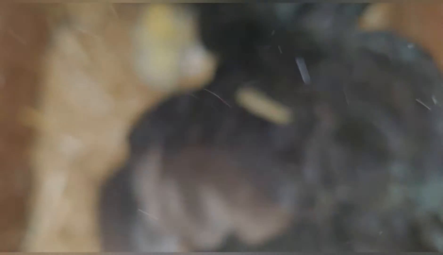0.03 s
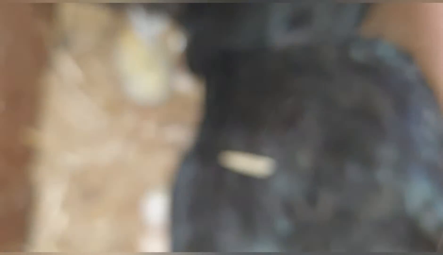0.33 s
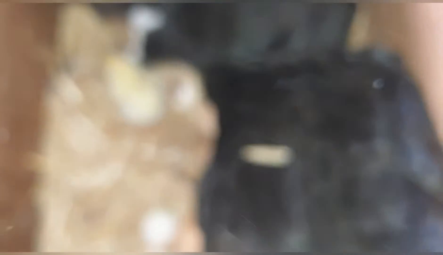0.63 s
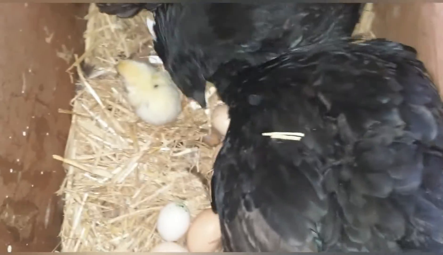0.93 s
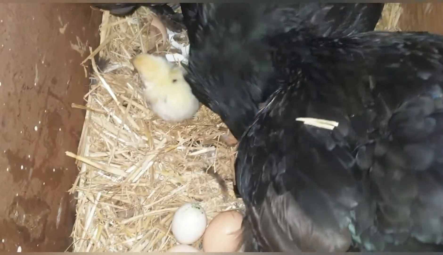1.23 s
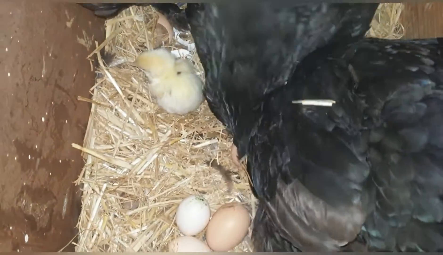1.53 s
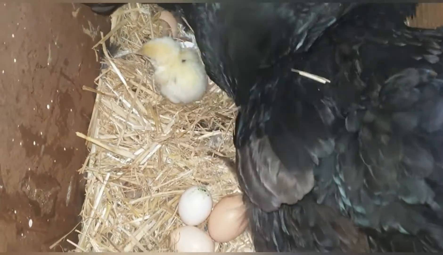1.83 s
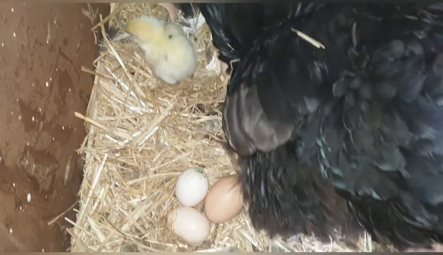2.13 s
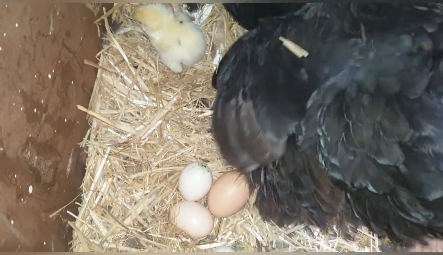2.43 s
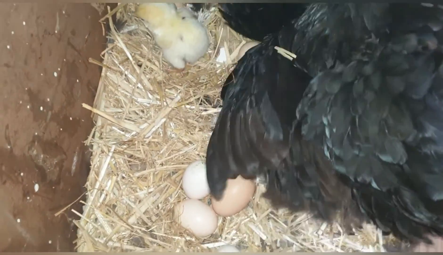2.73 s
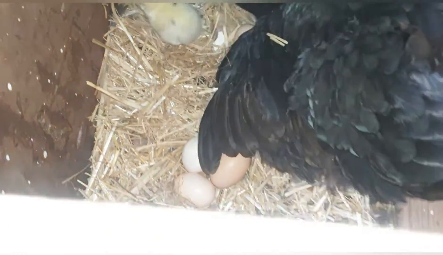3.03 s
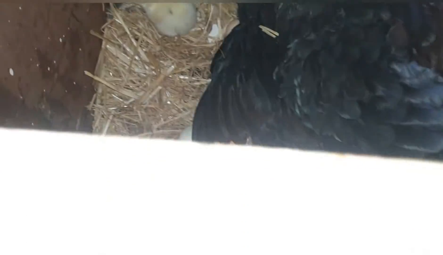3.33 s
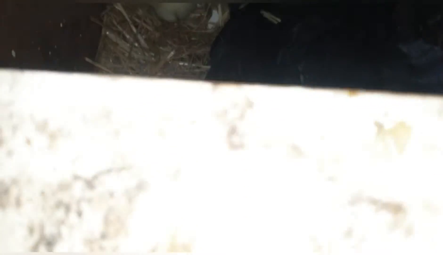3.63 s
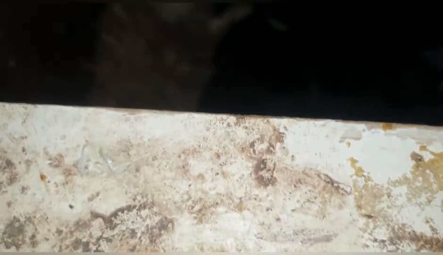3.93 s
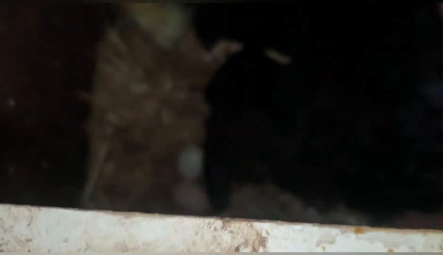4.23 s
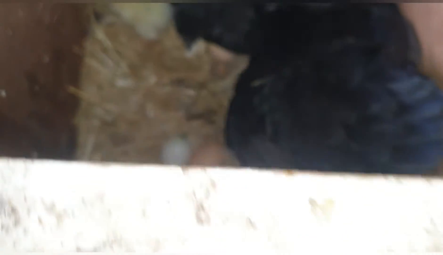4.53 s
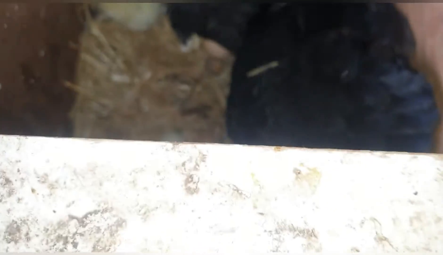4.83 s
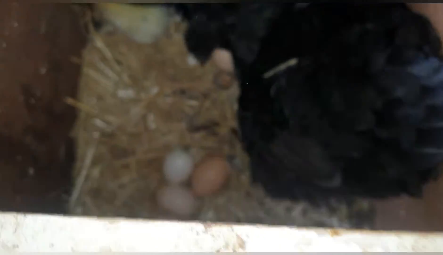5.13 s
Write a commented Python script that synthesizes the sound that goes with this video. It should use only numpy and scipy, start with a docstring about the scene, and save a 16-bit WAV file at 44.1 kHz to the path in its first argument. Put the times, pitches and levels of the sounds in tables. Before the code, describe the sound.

Close by in a small wooden coop, disturbed hens keep up rapid low clucks and hoarse, evenly paced calls that ring the nest box. A harsh squawk breaks out before the middle and another near the end, followed by a few thin whines. A chick peeps faintly now and then, straw rustles and snaps, and the box takes a few soft bumps over a faint hiss and hum.

```python
"""Broody hens disturbed in a coop

Close by in a small wooden coop, hens call with puffs of air shaped by throat and beak: low arching
clucks, hoarse evenly paced buks that ring the nest box, two harsh squawks and a few thin whines.
A chick whistles, straw rustles and snaps under the birds, and the box takes a few soft bumps.
A faint background hiss and a low hum lie underneath."""
import sys
import numpy as np
from scipy import signal
from scipy.fft import rfft, irfft, next_fast_len
from scipy.io import wavfile
from scipy.ndimage import uniform_filter1d

SR = 44100
rng = np.random.default_rng(int(sys.argv[2]) if len(sys.argv) > 2 else 0)


def file_out(sig):
    """Save sig as 16-bit WAV at sys.argv[1]."""
    # one column per channel
    cols = np.atleast_2d(sig).T
    # limit, then scale
    lim = np.clip(cols, -1, 1)
    pcm = np.round(lim * 32767).astype(np.int16)
    wavfile.write(sys.argv[1], SR, pcm)


N = 228834

# clucks: top of arch t/s, length/s, top f/Hz, level/dB
CLUCKS = [(.003, 0.059, 756.4, -37), (0.387, 0.051, 625.6, -35), (0.413, 0.046, 799, -37),
          (0.711, .044, 722.3, -34), (0.929, 0.059, 920, -37), (1.065, 0.041, 688.6, -30.5),
          (1.347, 0.05, 782.5, -31), (1.381, .027, 796, -28), (1.726, 0.033, 785, -28.5),
          (2.057, .05, 782.4, -35.5), (2.382, 0.025, 828, -44.5), (2.421, 0.047, 772, -36.5),
          (2.588, 0.041, 882, -48.5), (2.781, 0.028, 724, -34), (2.8, 0.035, 747.5, -36),
          (2.917, 0.035, 752, -43.5), (3.017, 0.061, 792, -46), (3.205, 0.052, 874, -37.5),
          (3.481, .052, 957, -41), (3.541, 0.044, 831, -41), (3.755, 0.02, 723, -42.5),
          (3.879, 0.051, 964, -40.5), (3.967, 0.045, 818, -39), (4.407, .048, 875, -36.5),
          (4.443, 0.072, 884, -37), (4.871, 0.053, 878, -40), (5.025, 0.077, 949, -39.5)]
# throat response, beak shut: f/Hz, gain/dB
CLUCK_THROAT = [(100, -26), (230, 2), (400, -0.5), (540, 3), (750, 1), (950, -5), (1150, -12.5),
                (1450, -21.5), (1900, -31), (4000, -75.5)]


def clucks(start_hz=409.7, end_hz=184, rise_share=.51, tail_s=.012, tail_db=-30):
    """Beak shut: a soft, near-pure tone arches up, then drops louder into single throaty puffs."""
    out = np.zeros(N)
    for top, length, top_hz, level_db in CLUCKS:
        start = top - rise_share * length
        end = start + length
        t = span(max(start, 0), end + tail_s)
        rise = np.clip((t - start) / (top - start), 0, 1)
        fall = np.clip((t - top) / (end - top), 0, 1)
        hz = start_hz + (top_hz - start_hz) * np.sin(rise * np.pi / 2) ** 1.554
        hz += (end_hz - top_hz) * (1 - np.exp(-(fall / .41) ** 2))
        puffs = syrinx(hz, jitter=.027 + .063 * fall, shimmer_db=1.8, air=.06)
        tone = evened(colour(puffs, CLUCK_THROAT), samples=260)
        shape_db = np.interp(fall, [0, .21, .85, 1], [-5, 3.5, -3, -14])
        shape_db += tail_db * np.maximum(t - end, 0) / tail_s
        add(out, t[0], tone * from_db(level_db + shape_db) * faded(t, fade_s=.005))
    return out


# buks: loudest t/s, level/dB, swell/s
BUKS = [(0.121, -41.5, 0.0175), (0.346, -41, 0.0194), (.568, -40.5, 0.0178), (0.787, -39, 0.0172),
        (1.011, -38, 0.0215), (1.235, -31.5, 0.0228), (1.464, -30, 0.022), (1.684, -29, 0.021),
        (2.278, -29.5, 0.0156), (2.531, -37, 0.0198), (2.787, -38.5, 0.0152), (3.093, -37, 0.011),
        (3.333, -37, 0.0203), (3.562, -33, 0.0155), (3.793, -35.5, 0.0298), (4.007, -33, 0.0152),
        (4.662, -34, 0.023), (4.899, -34, 0.0187), (5.138, -35, 0.0188)]
# throat and beak response: f/Hz, gain/dB
BUK_THROAT = [(200, -25.5), (420, 3), (680, -7), (800, 1), (980, 2.5), (1250, -6.5), (1480, -14),
              (1800, -4.5), (2550, -19.5), (3100, -32.5), (4500, -30.5), (6800, -24.5), (9000, -41.5),
              (16000, -39)]
# nest box air modes: f/Hz, width/Hz, gain/dB
BOX_MODES = [(806.5, 65, 11.5), (835.5, 33, 0), (1005, 136, 1), (946, 15, 20), (1233, 60, 8),
             (2612, 197, 18.5)]


def buks(lead_s=.031):
    """A short chaotic burst of voice rings the air modes of the box."""
    out = np.zeros(N)
    for peak_s, level_db, swell_s in BUKS:
        t = span(peak_s - lead_s, peak_s + .19)
        push = np.exp(-np.abs((t - peak_s + .0043) / swell_s) ** 1.06)
        puffs = syrinx(hz=750 + 60 * push, jitter=.19, shimmer_db=2.5, air=1.0)
        voice = colour(push * puffs, BUK_THROAT)
        voice += sum(from_db(db) * resonate(voice, hz, width) for hz, width, db in BOX_MODES)
        peak_rms = np.sqrt(uniform_filter1d(voice ** 2, size=900).max())
        add(out, t[0], from_db(level_db) * voice / peak_rms)
    return out


# squawks: t/s, length/s, effort build-up/s, strain onset/s, f/Hz, level/dB, swell/(dB/s), brightness/dB
SQUAWKS = [(1.746, 0.29, .011, .18, 863.8, -27.5, -7, 2.5), (4.076, 0.3, .062, .15, 856.5, -32, 16.5, -1)]
# throat response, beak open: f/Hz, gain/dB
SQUAWK_THROAT = [(200, -45.5), (570, -17), (860, 0.5), (1150, -6.5), (1430, -9.5), (1720, 0.5), (2030, -1),
                 (2330, 0), (2610, -7.5), (2900, -22), (3450, -25.5), (4750, -22), (6800, -20.5),
                 (8300, -31.5), (16000, -35)]


def squawks(strain_s=.13, release_s=.0668, slack_db=-8.5, release_db=-24, closing_db=-25.5, rasp_db=2.5):
    """Beak open: effort builds to a clear note, every third puff stronger; strain breaks it into chaos."""
    out = np.zeros(N)
    lowpass = signal.butter(4, 1350, fs=SR, output="sos")
    highpass = signal.butter(4, 3400, "high", fs=SR, output="sos")
    for start, length, build_s, clear_s, held_hz, held_db, swell_db_per_s, open_db in SQUAWKS:
        t = span(0, length + release_s)
        slack = np.exp(-t / build_s)
        strain = np.clip((t - clear_s) / strain_s, 0, 1)
        release = np.clip((t - length) / release_s, 0, 1)   # pitch sags, beak closes
        hz = held_hz * (1 - .125 * slack + .025 * np.sin(np.pi * strain) ** 2 - .072 * release)
        hz *= 1 + .0055 * waver(len(t), per_s=61.7)
        rough = .87 * slack ** 1.55 + .99 * strain ** 1.32
        puffs = syrinx(hz, jitter=.015 + .12 * rough, shimmer_db=4 * rough, air=.02 + .5 * rough,
                       weak=.35, strong_every=3)
        voice = colour(puffs, SQUAWK_THROAT)
        chest = signal.sosfiltfilt(lowpass, voice)
        beak = evened(voice - chest, samples=700)
        treble_flutter = from_db(3.3 * waver(len(t), per_s=120)) - 1
        beak += treble_flutter * signal.sosfiltfilt(highpass, beak)
        voice = evened(chest, samples=700) + from_db(open_db + closing_db * release) * beak
        level_db = held_db + swell_db_per_s * t + slack_db * slack + release_db * release
        spurts_db = rasp_db * rough * waver(len(t), per_s=140)
        add(out, start, from_db(level_db + spurts_db) * voice * faded(t, fade_s=.0064))
    return out


# whines: t/s, length/s, first f/Hz, last f/Hz, level/dB
WHINES = [(2.916, 0.063, 685, 685, -57.5), (3.144, 0.057, 692, 675, -57.5), (3.365, 0.078, 556, 528, -57.5),
          (3.67, 0.33, 655.5, 600, -65.5), (4.488, 0.203, 613.5, 637.7, -40.5),
          (4.653, 0.14, 805.3, 742.4, -42), (4.92, 0.062, 756, 735, -50)]
# throat and beak response: f/Hz, gain/dB
WHINE_THROAT = [(300, -13), (640, 4), (1250, -9.5), (1900, 6.5), (2400, 5.5), (3150, -3.5), (4000, -9.5),
                (6800, -13), (9000, -22.5), (16000, -32)]


def whines():
    """Thin wavering notes of alternately strong and weak puffs, gliding slowly."""
    out = np.zeros(N)
    for start, length, first_hz, last_hz, level_db in WHINES:
        t = span(0, length)
        hz = np.linspace(first_hz, last_hz, len(t)) * (1 + .0072 * waver(len(t), per_s=73.4))
        puffs = syrinx(hz, jitter=.01, shimmer_db=1.3, air=.22, weak=.82, strong_every=2)
        voice = evened(colour(puffs, WHINE_THROAT), samples=500)
        gain = from_db(level_db + 1.2 * waver(len(t), per_s=50))
        add(out, start, gain * voice * faded(t, fade_s=.028))
    return out


def syrinx(hz, jitter, shimmer_db, air, weak=1, strong_every=1):
    """One puff a cycle, uneven in time (jitter/cycles) and strength, with pulsing air noise."""
    cycles, samples = np.cumsum(hz) / SR, np.arange(len(hz))
    puff = np.arange(int(cycles[-1]) + 1)
    chance = rng.standard_normal((1000, 2))[:len(puff)]
    jitter, shimmer_db = (np.interp(puff, cycles, v + 0 * hz) for v in (jitter, shimmer_db))
    position = np.interp(puff + jitter * chance[:, 0], cycles, samples)
    strength = np.where(puff % strong_every, weak, 1) * from_db(shimmer_db * chance[:, 1])
    whole, part = position.astype(int), position % 1   # each puff straddles two samples
    pulses = np.bincount(whole, strength * (1 - part), len(hz) + 1)[:-1]
    pulses += np.bincount(whole + 1, strength * part, len(hz) + 1)[:-1]
    hiss = rng.standard_normal(SR)[:len(hz)] * (1 + np.cos(2 * np.pi * cycles))
    return rms_one(pulses - uniform_filter1d(pulses, 256)) + air * hiss


# peeps: t/s, length/s, first f/Hz, last f/Hz, level/dB
PEEPS = [(0.188, 0.044, 4360, 2270, -58), (0.699, 0.06, 4460, 2420, -57.5),
         (1.375, 0.077, 3950, 2600, -54.5), (1.618, 0.039, 3680, 4310, -49),
         (3.042, 0.042, 3490, 2620, -59), (4.009, 0.063, 2680, 4220, -52), (4.449, 0.069, 3750, 4000, -54),
         (4.759, 0.075, 3520, 4800, -54.5), (5.151, 0.045, 3430, 3100, -59.5)]


def chick(octave_db=-16, scoop_hz=490):
    """Whistles with a weak octave glide ever faster; rising ones dip first."""
    out = np.zeros(N)
    for start, length, first_hz, last_hz, level_db in PEEPS:
        progress = np.linspace(0, 1, int(length * SR))
        hz = first_hz + (last_hz - first_hz) * progress ** 2
        if last_hz > first_hz:
            hz -= scoop_hz * np.sin(np.pi * progress)
        phase = 2 * np.pi * np.cumsum(hz) / SR
        whistle = np.sin(phase) + from_db(octave_db) * np.sin(2 * phase)
        add(out, start, from_db(level_db) * signal.windows.tukey(len(hz), .4) * whistle)
    return out


# snapping stalks: t/s, relative level/dB
SNAPS = [(0.072, -43), (.178, -47), (0.25, -40), (.323, -55), (.903, -37.5), (1.0, -41), (1.125, -48.5),
         (1.174, -41.5), (1.443, -45), (1.545, -55), (2.678, -46), (2.711, -41.5), (3.206, -41.5),
         (3.491, -51), (3.626, -41.5)]
# snap spectrum: f/Hz, gain/dB
SNAP_COLOUR = [(500, -25), (2000, -3.5), (5500, 11), (9000, 7), (16000, 8.5)]


def straw_snaps(snap_s=.001, splinter_s=.011, splinter_db=-13, trim_db=-10):
    """Stalks snap, then splinter briefly."""
    out, t = np.zeros((2, N)), span(0, .0095)
    for start, level_db in SNAPS:
        burst = rng.standard_normal(len(t)) + rng.standard_normal((2, len(t)))
        splinters = from_db(splinter_db + 7.1 * waver(len(t), per_s=720))
        envelope = np.exp(-t / snap_s) + splinters * np.exp(-t / splinter_s)
        for side, noise in zip(out, burst):
            add(side, start, from_db(level_db + trim_db) * noise * envelope)
    return colour(out, SNAP_COLOUR)


# birds shifting: centre t/s, swell/s, level/dB
STIRS = [(.17, 0.58, -55), (1.03, .2, -54), (1.55, 0.33, -54.5), (1.92, 0.17, -47.5), (2.45, 0.85, -62),
         (2.762, 0.098, -52.5), (3.63, 0.13, -62.5), (4.6, 0.24, -52)]
# rustle spectrum: f/Hz, gain/dB
RUSTLE_COLOUR = [(300, 3), (1000, 0.5), (3000, -7), (5000, -7.5), (6800, -0.5), (8500, -9.5), (16000, -5)]


def straw_rustle(grains_per_s=900, crackle_db=-3, resting_db=-67.5, flutter_db=1.4):
    """Crackling straw and sliding feathers swell each time a bird shifts."""
    t = np.arange(N) / SR
    grains = (rng.random((3, N)) < grains_per_s / SR) * rng.standard_normal((3, N))
    grains *= from_db(4 * np.minimum(rng.exponential(1, (3, N)), 4))
    fibres = rng.standard_normal((3, N)) + from_db(crackle_db) * rms_one(grains)
    rustle = rms_one(colour(fibres[0] + fibres[1:], RUSTLE_COLOUR))   # row 0 feeds both sides
    stirs = [from_db(db) * np.exp(-((t - centre) / swell) ** 2) for centre, swell, db in STIRS]
    envelope = np.sqrt(from_db(resting_db) ** 2 + sum(stir ** 2 for stir in stirs))
    return envelope * from_db(flutter_db * waver(N, per_s=45)) * rustle


# bumps on the box: t/s, f/Hz, level/dB
BUMPS = [(0.154, 178, -36.5), (0.456, 177, -40.5), (0.948, 222, -25), (0.957, 240, -35.5),
         (1.905, 177, -34), (2.998, 61, -39), (3.091, 70.3, -40)]


def bumps(attack_s=.0016, decay_s=.012):
    """Dull knocks on the box die in a few cycles."""
    out, t = np.zeros(N), span(0, .12)
    envelope = np.exp(-t / decay_s) * (1 - np.exp(-t / attack_s))
    for start, hz, level_db in BUMPS:
        add(out, start, from_db(level_db) * np.sin(2 * np.pi * hz * t) * envelope)
    return out


def coop(x, t60_s=.15, gap_s=.003):
    """Dense short reflections from the boards, different on each side."""
    t = np.arange(SR // 2) / SR
    echoes = rng.standard_normal((2, len(t))) * from_db(-60 * t / t60_s) * (t > gap_s)
    echoes /= np.sqrt(np.sum(echoes ** 2, axis=1, keepdims=True))
    return signal.fftconvolve(x[None], echoes, axes=1)[:, :N]


# background hiss spectrum: f/Hz, gain/dB
HISS_COLOUR = [(25, -18), (65, -18), (100, -9.5), (200, -16), (400, -16), (850, -32.5), (1500, -38),
               (4000, -44.5)]
# background hiss and hum, swelling slightly and then sinking: t/s, level/dB
BACKGROUND_LEVEL = [(0, -63.5), (1.5, -59), (2.3, -64.5), (4.2, -62.5), (5.19, -66.5)]


def background(hum_hz=65.4, hum_over_hiss_db=3.5):
    """A faint dull hiss and a low wavering hum, slightly to the right."""
    noise = rng.standard_normal((3, N))
    hiss = rms_one(colour(noise[0] + .38 * noise[1:], HISS_COLOUR))
    hz = hum_hz + 3.05 * waver(N, per_s=6.7)
    hum = np.sin(2 * np.pi * np.cumsum(hz) / SR)
    level_db = np.interp(np.arange(N) / SR, *np.transpose(BACKGROUND_LEVEL))
    return from_db(level_db + [[-1], [1]]) * (hiss + from_db(hum_over_hiss_db) * hum)


def from_db(db):
    return 10 ** (np.asarray(db) / 20)


def rms_one(x):
    return x / np.sqrt(np.mean(x ** 2) + 1e-20)


def span(start_s, end_s):
    return np.arange(int(start_s * SR), int(end_s * SR)) / SR


def add(track, start_s, sound):
    i = max(int(start_s * SR), 0)
    track[i:i + len(sound)] += sound[:max(N - i, 0)]


def waver(samples, per_s):
    """Straight lines between unit-normal random knots."""
    knots = rng.standard_normal(600)
    return np.interp(np.arange(samples) * per_s / SR, np.arange(len(knots)), knots)


def faded(t, fade_s):
    """Envelope easing in from t = 0 and out to the last sample."""
    return np.sin(np.pi / 2 * np.clip(np.minimum(t, t[-1] - t) / fade_s, 0, 1)) ** 2


def evened(x, samples):
    """Running rms held near 1."""
    return x / np.sqrt(np.abs(uniform_filter1d(x * x, samples)) + 1e-4 * np.mean(x * x))


def at_hz(points, hz):
    """Interpolate over log frequency."""
    f, value = np.transpose(points)
    return np.interp(np.log(hz + 1), np.log(f), value)


def colour(x, spectrum):
    """Minimum-phase filter with the given spectrum."""
    size = 2 * next_fast_len(x.shape[-1] // 2 + 2048)
    gain = from_db(at_hz(spectrum, np.fft.rfftfreq(size, 1 / SR)))
    cepstrum = irfft(np.log(gain))
    cepstrum[1:size // 2] *= 2
    cepstrum[size // 2 + 1:] = 0
    return irfft(rfft(x, size) * np.exp(rfft(cepstrum)))[..., :x.shape[-1]]


def resonate(x, hz, width_hz):
    """Two-pole resonator, unity peak gain."""
    r = np.exp(-np.pi * width_hz / SR)
    feedback = [1, -2 * r * np.cos(2 * np.pi * hz / SR), r * r]
    return signal.lfilter(np.array([1, 0, -1]) * (1 - r * r) / 2, feedback, x + 1e-18)


def place(x, pan):
    """Stereo from level and phase differences by frequency."""
    hz, level_db, lead_rad = np.transpose(pan)
    bins_hz = np.fft.rfftfreq(N, 1 / SR)
    level_db, lead_rad = (at_hz(np.c_[hz, v], bins_hz) for v in (level_db, lead_rad))
    left = from_db(level_db / 2) * np.exp(.5j * lead_rad)
    return irfft(rfft(x) * np.array([left, 1 / left]), N)


# direct path of clucks: f/Hz, left minus right/dB, left lead/rad
CLUCK_PAN = [(100, 2, 0), (400, -4, 0.04), (950, -2, -.7)]
# direct path of buks, squawks, whines: f/Hz, left minus right/dB, left lead/rad
BEAK_PAN = [(450, -1.5, 0.42), (870, 2, 0.6), (1180, -6, 2.18), (1520, 5, 2.52), (1684, 13, .9),
            (2120, 3.5, -0.76), (2480, 13.5, -2.22), (4400, 0.5, -1)]


def scene():
    """Calls, direct and off the boards, over bumps, straw, hiss and hum."""
    clucking, bukking, cries, peeps = clucks(), buks(), squawks() + whines(), chick()
    direct = place(clucking, CLUCK_PAN) + place(bukking + cries, BEAK_PAN) + peeps + bumps()
    reflected = coop(from_db(-11) * clucking + bukking + from_db(2.5) * cries + from_db(-1.5) * peeps)
    return direct + reflected + straw_snaps() + straw_rustle() + background()


def record(dry, cutoff_hz=16200):
    """Steep low-pass."""
    return signal.sosfilt(signal.ellip(10, .1, 80, cutoff_hz, fs=SR, output="sos"), dry)


dry = scene()
out = record(dry)
file_out(out)
```